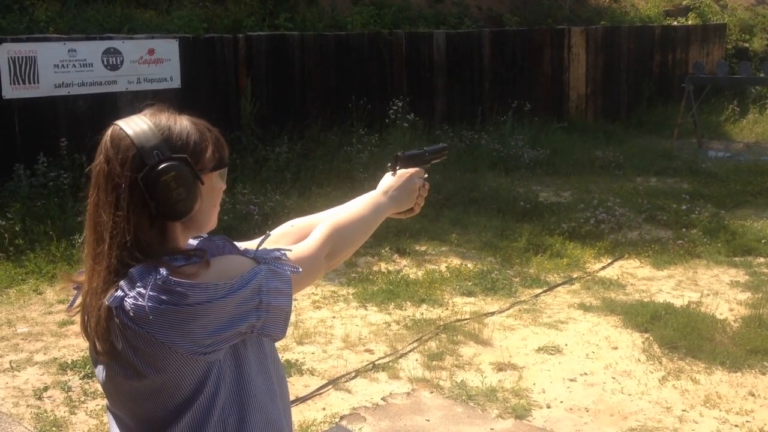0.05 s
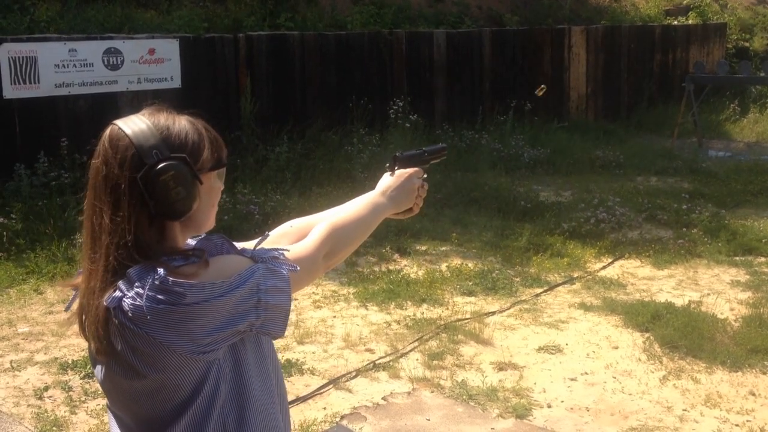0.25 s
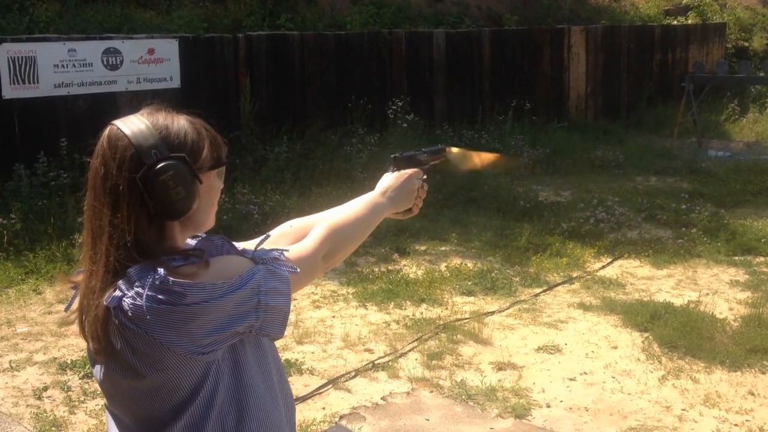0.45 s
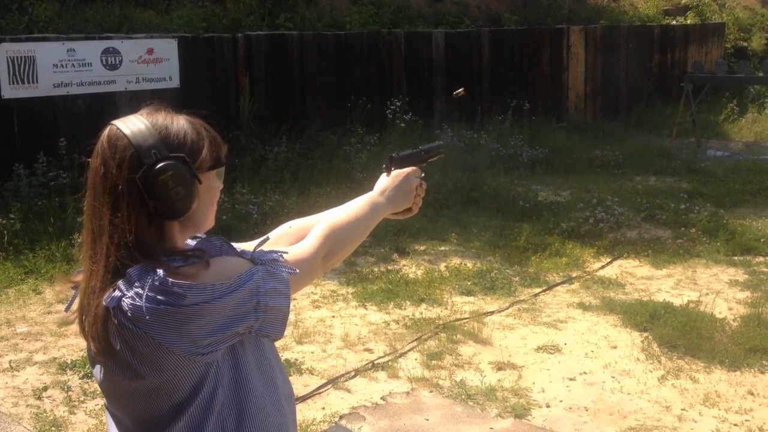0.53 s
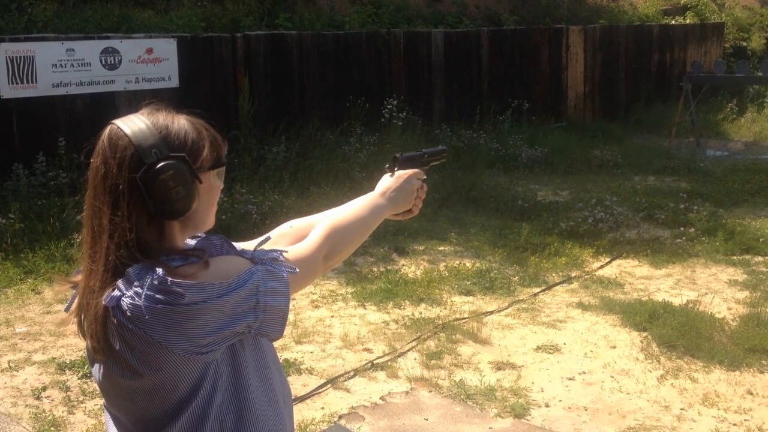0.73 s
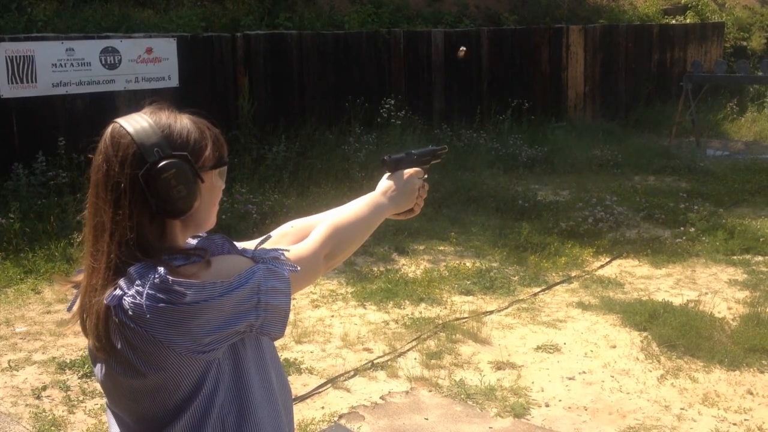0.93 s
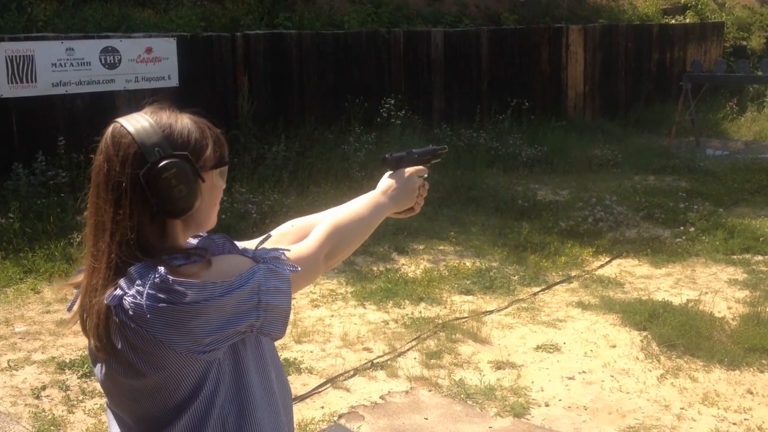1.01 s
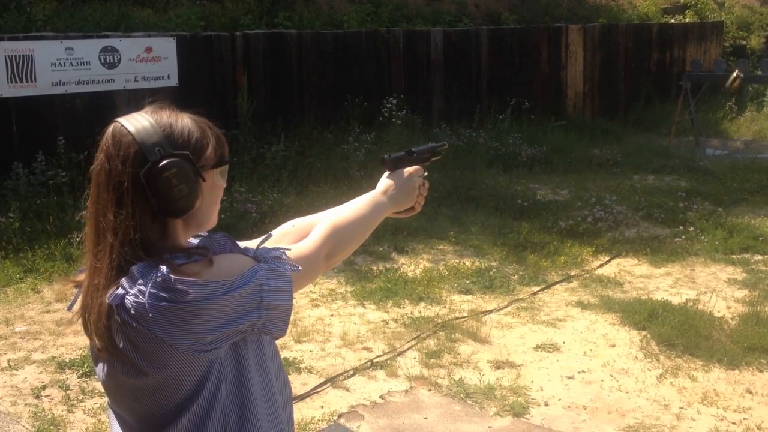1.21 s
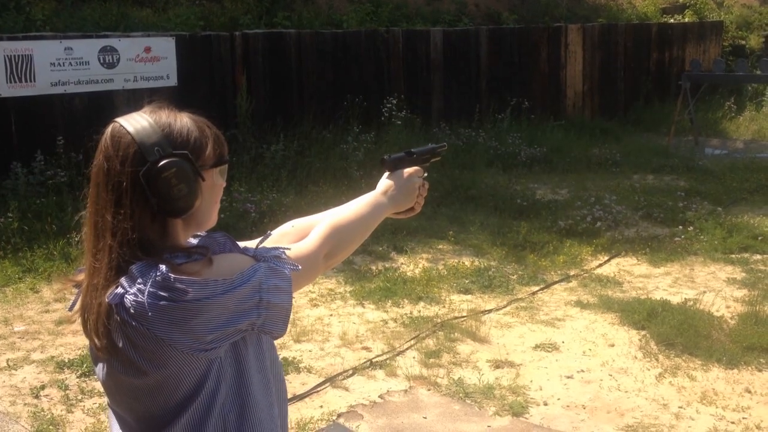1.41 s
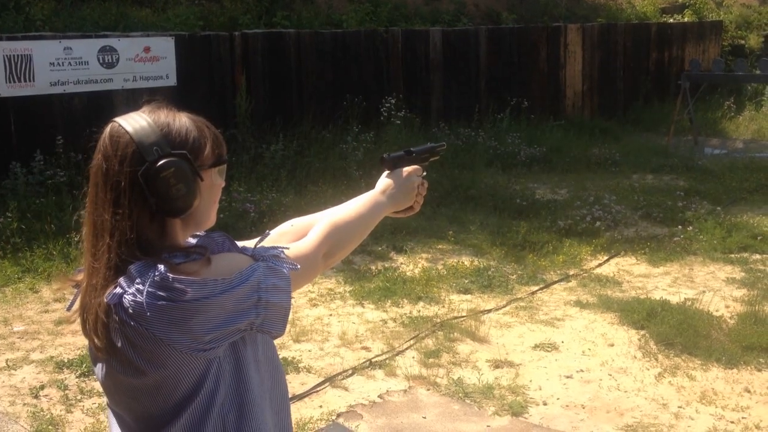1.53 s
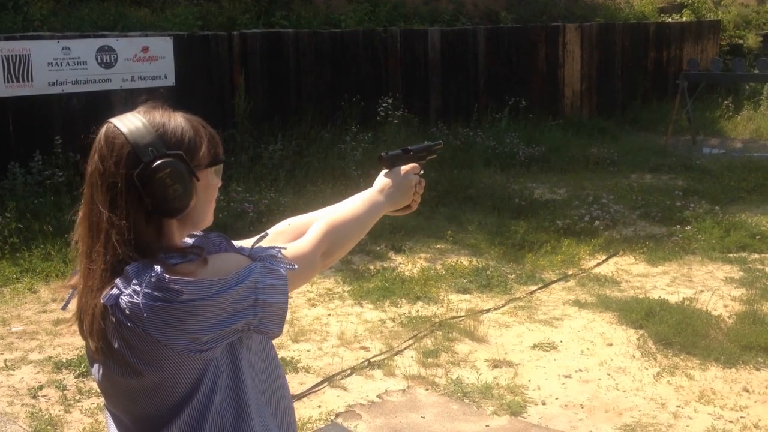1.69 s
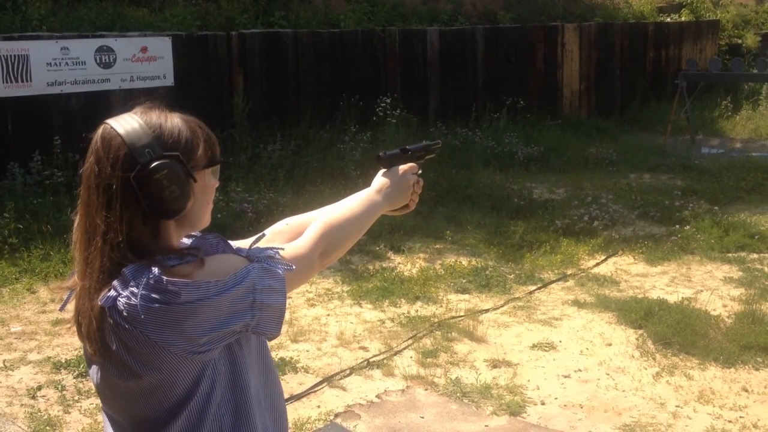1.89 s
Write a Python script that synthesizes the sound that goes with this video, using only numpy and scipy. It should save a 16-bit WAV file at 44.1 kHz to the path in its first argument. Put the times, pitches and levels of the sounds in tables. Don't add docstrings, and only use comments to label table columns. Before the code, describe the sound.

Pistol shots outdoors: a fading echo, then three loud sharp cracks in quick succession, casings ticking after

```python
import sys
import numpy as np
from scipy import signal
from scipy.fft import rfft, irfft, next_fast_len
from scipy.io import wavfile
from scipy.ndimage import uniform_filter1d

SR = 44100
rng = np.random.default_rng(int(sys.argv[2]) if len(sys.argv) > 2 else 0)


def inscribe(sig):
    pcm = np.round(np.clip(np.atleast_2d(sig).T, -1, 1) * 32767)
    wavfile.write(sys.argv[1], SR, pcm.astype(np.int16))


def voltage_ratio(level):
    return 10 ** (np.asarray(level, float) / 20)


N = 85995
ANSWER_N = SR + SR // 2

# (time [s], strength [dB])
SHOTS = [
    (-.165, 0.5),
    (0.2064, 1.5),
    (.5660, 2),
    (.9100, 2),
]
# (frequency [Hz], loss rate [dB/s])
AIR_DB_PER_S = [(500, 8.5), (3000, 1.5), (8000, 13.5), (15000, 45.5)]


def unit(x):
    return x / np.sqrt(np.mean(x ** 2) + 1e-20)


def along(points, hz):
    f, v = np.transpose(points)
    return np.interp(np.log(hz + 1), np.log(f + 1), v)


def filtered(x, response):
    m = next_fast_len(x.shape[-1] + 8192)
    spectrum = rfft(x, m) * response(np.fft.rfftfreq(m, 1 / SR))
    return irfft(spectrum, m)[..., :x.shape[-1]]


def peak(hz, width_hz):
    return lambda f: (1.5j * f * width_hz / (hz * hz - f * f + 1.5j * f * width_hz)) ** 2


def shaped(noise, gain, size):
    hz, t, z = signal.stft(noise, SR, nperseg=size)
    z = z * gain(hz[:, None], t[None])
    return signal.istft(z, SR, nperseg=size)[1][:len(noise)]


def muzzle_blast():
    blast_s, blast_db = 0.0005, -3
    u = np.arange(ANSWER_N) / SR / blast_s
    return voltage_ratio(blast_db) * (1 - u) * np.exp(-u)


def gas_jet(noise, grain):
    # (frequency [Hz], level [dB])
    jet_colour = [(100, -22), (300, -1), (1000, 6.5), (2500, -6), (6000, 3.5), (9000, -8.5), (15000, -11.5)]
    # (frequency [Hz], t60 [s])
    jet_t60 = [(200, .13), (1000, .09), (2500, .08), (6000, 0.075), (14000, 0.094)]
    # (frequency [Hz], rise time [s])
    jet_rise = [(200, 0.019), (1000, 0.002), (3000, 0.00067), (8000, 0.0015)]
    jet_db, jet_grain_db = -3.5, -2

    def gain(hz, s):
        decay = voltage_ratio(along(jet_colour, hz) - 60 * s / along(jet_t60, hz))
        return decay * (1 - np.exp(-(s + 0.00023) / along(jet_rise, hz)))

    return voltage_ratio(jet_db) * shaped(noise * voltage_ratio(jet_grain_db * grain), gain, size=64)


def ground_scatter(noise, grain):
    # (frequency [Hz], density [dB per Hz])
    yard_colour = [(80, -32), (170, 0.5), (400, -3), (1000, 0), (2500, -7), (6000, -12.5), (9000, -22.5),
                   (15000, -30)]
    grain_db = 2
    return unit(filtered(noise * voltage_ratio(grain_db * grain), lambda hz: voltage_ratio(along(yard_colour, hz))))


def yard(noise, grain):
    # (delay [s], level [dB])
    yard_fade = [(0, -5.5), (0.039, -18.5), (0.119, -20.5), (.17, -29), (0.199, -35), (0.269, -45),
                 (.325, -47), (.35, -57), (0.451, -72.5)]
    delay_s, fade_db = np.transpose(yard_fade)

    def gain(hz, s):
        return voltage_ratio(np.interp(s, delay_s, fade_db, right=-120) - s * along(AIR_DB_PER_S, hz))

    return shaped(ground_scatter(noise, grain), gain, size=256)


def far_trees(noise, grain):
    # (frequency [Hz], level [dB])
    far_bass = [(60, 0), (150, 1), (300, -1)]
    far_db, far_t60_s = -47, 1.4

    def gain(hz, s):
        return voltage_ratio(far_db + along(far_bass, hz) - 60 * s / far_t60_s - s * along(AIR_DB_PER_S, hz))

    return shaped(ground_scatter(noise, grain), gain, size=256)


def burst(noise, hz, width_hz, t60_s):
    front_s, wake_rise = .17, 0.031
    t = np.arange(len(noise)) / SR
    push = noise * voltage_ratio(-60 * t / t60_s) * (1 - np.exp(-t / (wake_rise * t60_s)))
    push[0] = front_s / t60_s
    out = filtered(push, peak(hz, width_hz))
    return out / np.abs(out).max()


def walls_and_panels(noise):
    # (delay [s], level [dB], centre [Hz], width [Hz], t60 [s])
    walls = [(.0003, 3.5, 4445, 5000, 0.017), (.005, 0.5, 2180, 600, 0.054), (.012, -8, 1120, 600, 0.023),
             (.016, -3, 2220, 500, .03), (.018, -3.5, 230, 241.7, .012), (.024, -10.5, 500.6, 700, 0.034),
             (.034, -6.5, 330, 341, .022), (.035, -12, 6500, 5000, .015), (.040, 1.5, 2100, 1500, 0.01),
             (.0550, -1, 800, 700, .012), (.0592, -3, 900, 600, .016), (.0725, -6.5, 880, 403, .055),
             (.076, -8.5, 4697, 1000, .01), (.084, -17.5, 5087, 4970, 0.017), (.100, -13, 1150, 700, .08),
             (.108, -10.5, 1250, 500, 0.077), (.113, -11.5, 450, 500, .015), (.146, -18, 900, 890, .04),
             (.159, -20.5, 755, 700, 0.037), (.225, -43, 395.8, 402, .03), (.240, -54, 1200, 930, 0.01),
             (.304, -38, 1150, 350, 0.047), (.320, -45, 1090, 900, 0.024), (.452, -46, 1500, 1950, 0.025)]
    from_s, every_s, panel_db, fade_db = 0.089, 0.0097, -14.5, 5.5
    panels = [(from_s + k * every_s, panel_db - k * fade_db, 300, 1000, .015) for k in range(9)]
    out = np.zeros(ANSWER_N)
    for k, (s, db, hz, width_hz, t60_s) in enumerate(walls + panels):
        echo = burst(noise[k * 1024:][:4096], hz, width_hz, t60_s)
        out[round(s * SR):][:4096] += voltage_ratio(db) * echo
    return out


def answer(noise):
    grain_s = .0008
    grain = unit(uniform_filter1d(noise[0, ::-1], size=round(grain_s * SR)))
    direct = muzzle_blast() + gas_jet(noise[0], grain)
    return direct + yard(noise[1], grain) + far_trees(noise[2], grain) + walls_and_panels(noise[3])


def pistol():
    # (frequency [Hz], share of an echo that repeats from shot to shot)
    same_share = [(300, 0.78), (2000, 0.62), (6000, 1), (12000, .3)]
    lead = SR // 4
    out = np.zeros(lead + N + ANSWER_N)
    place = rng.standard_normal((4, ANSWER_N))

    def share(hz):
        return np.clip(along(same_share, hz), 0, 1)

    for s, db in SHOTS:
        fresh = rng.standard_normal((4, ANSWER_N))
        noise = filtered(place, lambda hz: np.sqrt(share(hz)))
        noise = noise + filtered(fresh, lambda hz: np.sqrt(1 - share(hz)))
        out[lead + round(s * SR):][:ANSWER_N] += voltage_ratio(db) * answer(noise)
    return out[lead:][:N]


def outdoors():
    # (frequency [Hz], density [dB per Hz])
    floor_colour = [(40, 14), (80, 1.5), (160, -5.5), (450, -4), (900, -10), (4000, -21), (10000, -35.5),
                    (15000, -31)]
    # (frequency [Hz], lump depth [dB])
    lump_depth = [(300, -0.5), (800, 2.5), (2000, -1.5)]
    floor_db = -55
    patches = rng.standard_normal((129, N // 128 + 2))
    patches = uniform_filter1d(patches, size=5, axis=0)
    patches = unit(uniform_filter1d(patches, size=3, axis=1))

    def gain(hz, s):
        return voltage_ratio(along(lump_depth, hz) * patches[:, :s.size])

    lumps = shaped(rng.standard_normal(N), gain, size=256)
    return voltage_ratio(floor_db) * unit(filtered(lumps, lambda hz: voltage_ratio(along(floor_colour, hz))))


def contact(hz, width_hz, rattle_db):
    rattle_t60_s, rattle_grain_db = 0.12, 4
    t = np.arange(8192) / SR
    grain = unit(uniform_filter1d(rng.standard_normal(len(t)), size=40))
    push = voltage_ratio(rattle_db - 60 * t / rattle_t60_s + rattle_grain_db * grain)
    push = push * rng.standard_normal(len(t))
    push[0] = -1
    tick = filtered(push, peak(hz, width_hz))
    return tick / np.abs(tick).max()


def ticks_and_cases():
    # (time [s], peak level [dB], ring [Hz], width [Hz], rattle level [dB])
    knocks = [(.2420, -3.5, 8200, 842, -69), (0.869, -40, 198, 123.9, -40), (1.487, -30.5, 3460, 4920, -26),
              (1.4876, -31, 1786, 3500, -30.5), (1.4943, -34, 4074, 1000, -36),
              (1.511, -62, 3990, 4960, -26), (1.549, -54, 446, 300, -29), (1.632, -45, 2500, 2200, -36),
              (1.7889, -17, 2050, 1700, -40), (1.7889, -23, 4200, 1500, -38),
              (1.7889, -26, 6500, 4000, -36), (1.7889, -33, 700, 800, -40), (1.7974, -33.5, 1760, 900, -29),
              (1.799, -35, 5500, 3000, -40), (1.801, -47, 4010, 5010, -23.5), (1.811, -43, 3480, 4000, -19),
              (1.835, -41, 3500, 4000, -29.5), (1.865, -55, 454, 300, -29), (1.903, -46.5, 370, 118.6, -26),
              (1.944, -52, 500, 300, -36)]
    lead_in_s, top_hz = .0055, 9000
    lead_ins = [(s - lead_in_s, -34, 5500, 6000, -6) for s, _ in SHOTS if s > 0]
    out = np.zeros(N + SR)
    for s, db, hz, width_hz, rattle_db in knocks + lead_ins:
        out[round(s * SR):][:8192] += voltage_ratio(db) * contact(hz, width_hz, rattle_db)
    return filtered(out[:N], lambda f: top_hz ** 2 / (top_hz ** 2 - f * f + 1.4j * f * top_hz))


def scene():
    return (pistol() + outdoors() + ticks_and_cases())[None]


def roll_off(x):
    return signal.sosfilt(signal.butter(12, 15920, fs=SR, output="sos"), x)


def record(dry):
    clip_top, clip_hard = 1, 2.6
    bass_cut_hz, top_hz = 107.4, 15700
    thump_db, thump_hz, thump_power = -7, 45, 5
    held = dry / (1 + np.abs(dry / clip_top) ** clip_hard) ** (1 / clip_hard)

    def band(f):
        cut = ((1j * f) ** 2 / (bass_cut_hz ** 2 - f * f + 1.3j * f * bass_cut_hz)) ** 2
        return cut / (1 + (f / top_hz) ** 200)

    thump = filtered(np.abs(held) ** thump_power, lambda f: (1 + 1j * f / thump_hz) ** -2)
    mix = filtered(held, band) - voltage_ratio(thump_db) * thump
    return roll_off(np.clip(mix, -1, 1))


dry = scene()
out = record(dry)
inscribe(out)
```